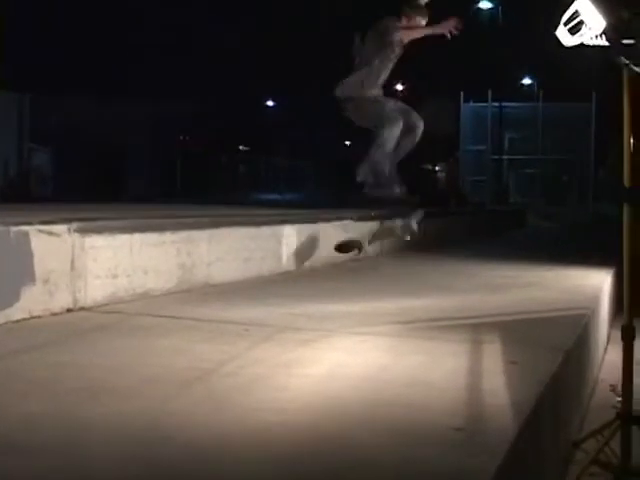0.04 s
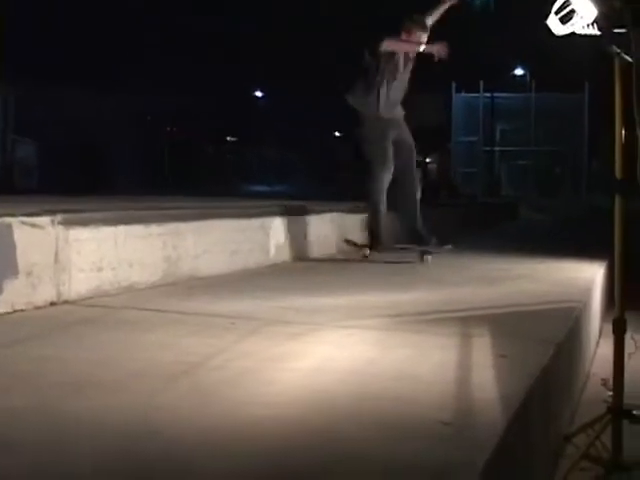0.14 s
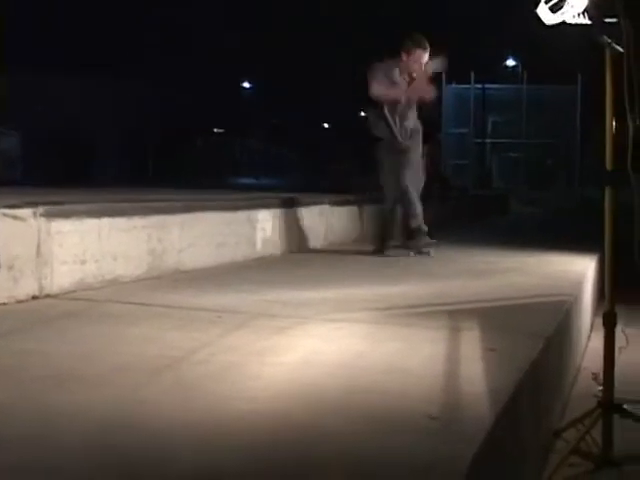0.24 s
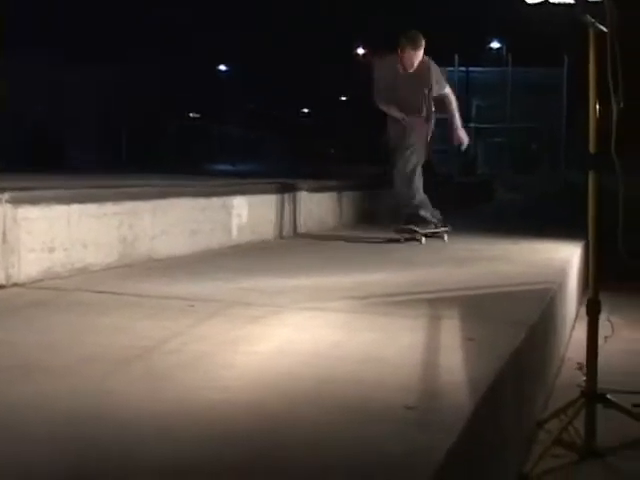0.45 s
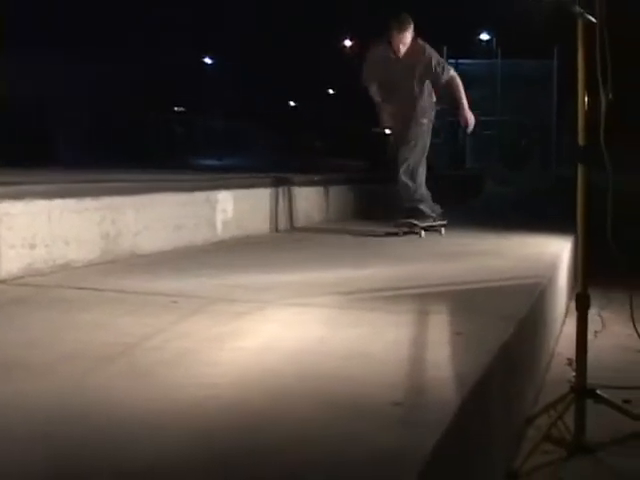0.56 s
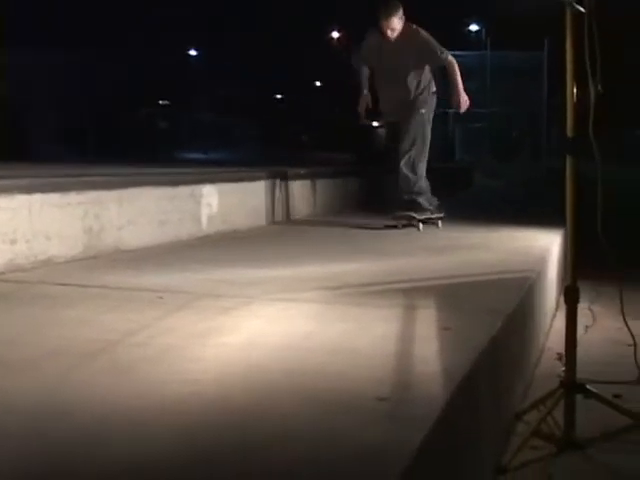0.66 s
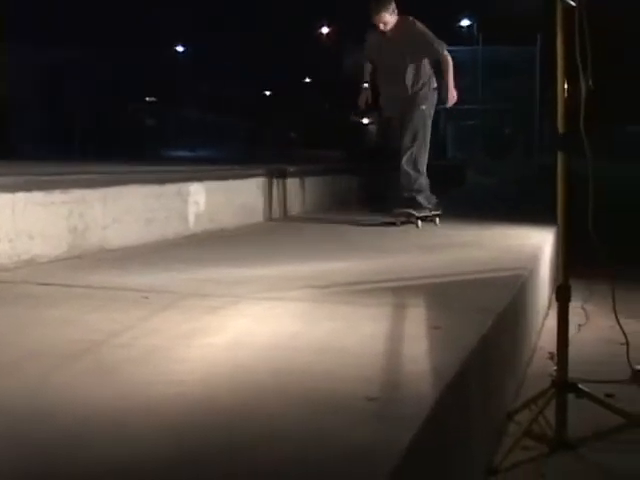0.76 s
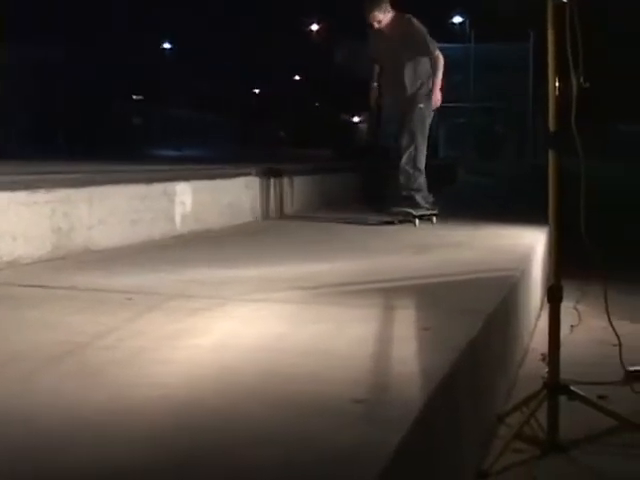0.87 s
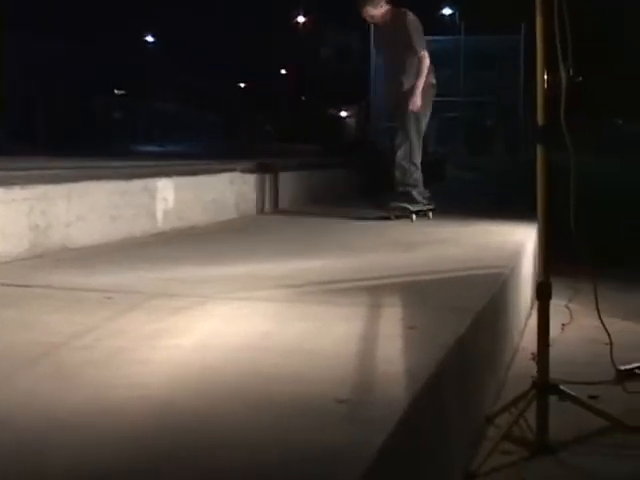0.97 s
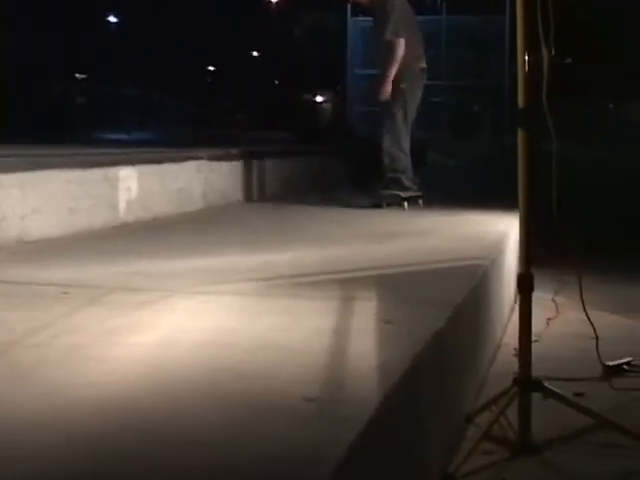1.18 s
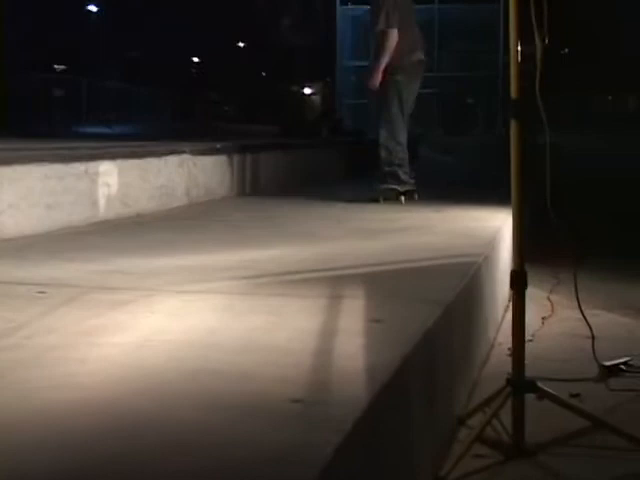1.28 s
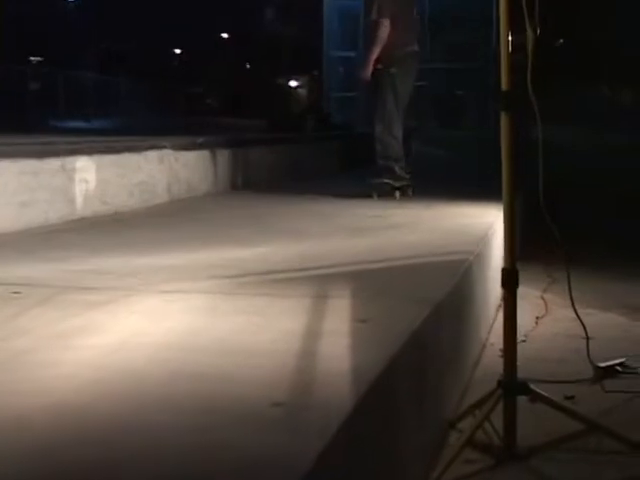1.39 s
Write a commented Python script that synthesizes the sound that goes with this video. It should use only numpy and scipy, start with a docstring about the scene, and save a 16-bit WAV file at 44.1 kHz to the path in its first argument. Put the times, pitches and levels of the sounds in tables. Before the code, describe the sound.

Sharp skateboard clacks on concrete, a short barking skid, then wheels rolling off over joints.

```python
"""A low distant hum and the faint hiss of free wheels, then a skateboard slams onto concrete at night.
Each impact excites the modes of deck, wheels and trucks; the loudest clacks overload the microphone.
The board chatters and skids briefly sideways, barking by stick-slip friction. It rolls away over two
joints, driven by the grain of the slab, its dry bearings chirping faintly. Walls return a dull echo."""
import sys
import numpy as np
from scipy import signal
from scipy.fft import rfft, irfft, next_fast_len
from scipy.io import wavfile
from scipy.ndimage import map_coordinates

SR = 44100
rng = np.random.default_rng(int(sys.argv[2]) if len(sys.argv) > 2 else 0)


def unload_audio(sound):
    """Save the sound as a 16-bit wav file, at the path given as the first command line argument."""
    columns = np.transpose(np.atleast_2d(sound))
    # keep every value between -1 and 1, then stretch to whole-number steps
    steps = np.round(np.clip(columns, -1, 1) * 32767)
    wavfile.write(sys.argv[1], SR, steps.astype(np.int16))


N = 63945

# Spectrum of the outdoor rumble (f/Hz, level/dB)
RUMBLE_SPECTRUM = [(20, -19), (45, -7.5), (75, -1.5), (105, 3), (160, -6.5), (200, -9), (400, -15),
                   (1000, -27), (3000, -47), (15000, -55)]
# Envelope of the rumble (t/s, level/dB)
RUMBLE_ENVELOPE = [(0, -40.5), (.3, -43.5), (.7, -36), (1.0, -37), (1.3, -36.5), (1.37, -38), (1.43, -33)]
# Partials of a distant engine (f/Hz, level/dB)
ENGINE_PARTIALS = [(101, -47.5), (155, -42)]
# Chirps of the dry bearings (centre t/s, f/Hz, level/dB)
BEARING_CHIRPS = [(.575, 7540, -51), (0.714, 7500, -44.5), (.773, 8270, -51), (0.854, 7360, -59),
                  (.937, 8500, -51), (.958, 6330, -66), (1.038, 7570, -47), (1.062, 8500, -51),
                  (1.111, 8100, -51.5), (1.183, 6200, -57), (1.208, 7030, -51), (1.435, 7100, -51.5)]
# Envelope of the wheels on the rough slab (t/s, level/dB)
ROLL_ENVELOPE = [(0, -54), (.09, -39), (.195, -47.5), (.23, -19), (.31, -24), (.349, -22), (.362, -23.5),
                 (.42, -28.5), (.51, -34), (.6, -36), (.7, -36.5), (.85, -41), (1.0, -42), (1.45, -43)]
# Resonances of the rolling board (f/Hz, bandwidth/Hz, level/dB)
ROLL_RESONANCES = [(261.4, 51, -5), (324, 26.5, -6), (548.4, 69, -1.5), (744, 257, -9), (1026, 81, 0),
                   (1390, 80, -10), (1543, 62, -5), (1970, 114, -11.5), (2780, 120, -23)]
# Spectrum of the wheels' gritty hiss (f/Hz, level/dB)
HISS_SPECTRUM = [(200, -7), (1500, 3), (2600, -4), (3600, -10), (4500, -4.5), (6000, -8.5), (8300, -10),
                 (10500, -16.5), (16000, -32)]
# Hollow ring of the wheels (f/Hz, level/dB relative to the rolling envelope)
WHEEL_MODES = [(1035, -10.5), (1555, -18)]
# Gritty scuffs of the wheels (centre t/s, half-width/s, level/dB)
SCUFF_SWELLS = [(0.312, 0.013, -34), (0.347, 0.0059, -32), (1.059, 0.0056, -52), (1.256, 0.042, -51.5),
                (1.303, .005, -48)]
# Resonances excited by scuffing (f/Hz, bandwidth/Hz, level/dB)
SCUFF_RESONANCES = [(2370, 790, -9), (2880, 180, -0.5), (3400, 140, -3), (4300, 170, -9), (4900, 310, -7),
                    (7600, 1500, -15)]
# Envelope of the sideways skid (t/s, level/dB)
SKID_ENVELOPE = [(.415, -50), (.424, -20.5), (.435, -19.5), (.444, -5), (.452, -9.5), (.458, -2),
                 (.464, -13.5), (.473, -3.5), (.48, -6), (.484, -19.5), (.495, -37), (.52, -63)]
# Stick-slip slows and turns regular as the wheels grip (t/s, f/Hz, level/dB over the friction noise)
SLIP_CYCLE = [(.44, 935, 1), (.452, 925, 1), (.461, 690, -2), (.47, 684, 8), (.482, 681, 8)]
# Resonances excited by the skid (f/Hz, bandwidth/Hz, level/dB)
SKID_RESONANCES = [(560, 90, -5.5), (930, 230, -7.5), (1265, 270, -1.5), (1642, 61, 5.5), (1810, 190, -0.5),
                   (2107, 210, -1), (2795, 200, -12.5), (2978, 103, -4.5), (3363, 180, -12.5),
                   (4300, 200, -16.5), (4930, 124, -9.5), (8000, 330, -20)]
# Spectrum of the grit in the skid (f/Hz, level/dB)
SKID_SPECTRUM = [(100, -34), (400, -27), (1500, 5.5), (4000, -4), (8000, -2.5), (11000, -11.5),
                 (16000, -31)]
# Deep, short thuds under the heaviest clacks (t/s, level/dB, f/Hz, T60/s)
LOW_THUDS = [(.207, -23, 34, 0.16), (0.2087, -11.5, 231, 0.057), (0.278, -25, 33, 0.29),
             (0.624, -28, 146, 0.1), (0.868, -24.5, 153, 0.07)]
# Modes of the deck with its trucks and wheels (f/Hz, level/dB, multiple of the base T60)
DECK_MODES = [(197.4, -21.5, 1.5), (283.6, -12, 1.24), (475, -11, 0.94), (576, -7, 1.3), (710, -10.5, 0.95),
              (871, -12, 1.05), (1022, -7.5, 1.43), (1120, -16, 0.81), (1322, -10, 1.08), (1424, -7, 0.84),
              (1646, -14, 0.76), (1874, -4.5, 0.79), (2057, -8, 0.94), (2397, -13.5, 0.63)]
# Spectrum of the contact crack (f/Hz, level/dB)
CRACK_SPECTRUM = [(150, -17.5), (600, 1), (1500, 7.5), (2700, -7), (4000, -7), (5500, -9.5), (8000, -10),
                  (11000, -20), (16000, -35)]
# Bright resonances of trucks and wheels (f/Hz, bandwidth/Hz, level/dB)
TRUCK_RESONANCES = [(2560, 190, 7.5), (3495, 285, 3.5), (4980, 200, 2), (5200, 180, 2), (5825, 144, 0.5),
                    (7100, 81, -24), (8100, 220, -24), (8900, 140, -6), (9930, 200, -16)]
# Deck and wheels hit the ground (t/s, level/dB, thump/dB, wheels/dB, trucks/dB, crack/dB, base T60/s)
LANDING_IMPACTS = [(.2063, 4, 2, 3, 2.5, -2, 0.038), (.2125, 1.5, -0.5, -7, -4, -9, 0.034),
                   (.2205, -9, -5, -10, 3, 5, .036), (.2365, -29, 17, -15, 25, 6, 0.021),
                   (.2485, -3.5, -0.5, -16, 6, 3, 0.082), (.2763, 2, -14, 0.5, 5, -1, 0.031),
                   (.2825, -1, -2, 5.5, -13, -0.5, 0.057), (.294, -16, -4, 14, 11, 9, 0.045),
                   (.3699, 11.5, -14, 0.5, -15.5, -9.5, 0.013), (.3874, -5.5, -7.5, 7.5, 3, -1, 0.032),
                   (.401, -5, -13, 5, 1, 2, 0.028), (.4142, -12.5, -18, 4, -17, -2, 0.062)]
# Wheels drop into the slab joints (columns as for the landing)
JOINT_IMPACTS = [(.6218, -12.5, -0.5, 4, -20, 1.5, 0.056), (.6348, -6.5, -9.5, -2, -0.5, 2, .046),
                 (.6515, -22.5, -0.5, 6.5, 1, -5, 0.042), (.8663, -20, -26, 12.5, 5.5, 2.5, 0.023),
                 (.8682, -19, 7.5, 8.5, 4.5, 0, 0.037), (.8822, -24, 3, -12, 7, 11, 0.073),
                 (.8895, -23.5, 8, -5, -10, 3, 0.015)]

TIME = np.arange(N) / SR


def amp(db):
    """Amplitude ratio: tenfold for every 20 dB."""
    return 10 ** (np.asarray(db) / 20)


def unit(x):
    """Normalisation to an rms of 1."""
    return x / np.sqrt(np.mean(x ** 2) + 1e-20)


def envelope(points):
    """Gain per sample by linear interpolation of (t/s, level/dB) points."""
    return amp(np.interp(TIME, *np.transpose(points)))


def wobble(knots_per_s):
    """Smooth fluctuation by spline interpolation of random values."""
    return map_coordinates(rng.standard_normal(N // 8), [TIME * knots_per_s], mode="wrap")


def filtered(x, response):
    """Linear filtering: the spectrum is multiplied by a frequency response."""
    size = next_fast_len(N + SR // 2)
    return irfft(rfft(x, size) * response(np.fft.rfftfreq(size, 1 / SR)), size)[:N]


def coloured(x, spectrum):
    """Spectral shaping by (f/Hz, level/dB) points, at rms 1."""
    hz, db = np.transpose(spectrum)
    return unit(filtered(x, lambda f: amp(np.interp(np.log(f + 1), np.log(hz), db))))


def resonate(x, resonances):
    """Forced response of parallel damped resonators of alternating sign, at rms 1."""
    def response(f):
        return sum((-1) ** k * amp(db) * 1j * f * width / (hz * hz - f * f + 1j * f * width)
                   for k, (hz, width, db) in enumerate(resonances))
    return unit(filtered(x, response))


def noise():
    """White noise: equal mean power at all frequencies."""
    return rng.standard_normal(N)


def decay(t, t60):
    """Exponential damping by 60 dB in t60 seconds."""
    return np.exp(-np.log(1000) * t / t60)


def grains(per_s=4000):
    """Shot noise: tiny independent impacts on the concrete's grain."""
    return noise() * (rng.random(N) < per_s / SR)


def wavering(partials, depth_db, level_rate, drift_rad, phase_rate):
    """Random amplitude and phase modulation of (f/Hz, level/dB) tones; rates in knots a second."""
    out = np.zeros(N)
    for hz, db in partials:
        gain = amp(db + depth_db * wobble(level_rate))
        out += gain * np.sin(2 * np.pi * hz * TIME + drift_rad * wobble(phase_rate))
    return out


def night_hum():
    """Tones of a distant engine are superposed on low broadband rumble."""
    drone = wavering(ENGINE_PARTIALS, depth_db=1, level_rate=12, drift_rad=1.3, phase_rate=6.6)
    return drone + envelope(RUMBLE_ENVELOPE) * coloured(noise(), RUMBLE_SPECTRUM)


def yard_echo(x, t60=0.21, cutoff_hz=2500):
    """Reverberation from ledge and walls: convolution with a dull, decaying impulse response."""
    tail = filtered(noise() * decay(TIME, t60), lambda f: 1 / (1 + 1j * f / cutoff_hz))
    return signal.fftconvolve(x, tail / np.linalg.norm(tail))[:N]


def bearings(half_width_s=0.011, fall_hz_per_s=13000, spread_hz=440):
    """Dry bearings emit thin, falling chirps, blurred by random frequency modulation."""
    out = np.zeros(N)
    for centre, hz, db in BEARING_CHIRPS:
        t = TIME - centre
        pitch = hz - fall_hz_per_s * t + spread_hz * wobble(1100)
        out += amp(db) * np.exp(-(t / half_width_s) ** 2) * np.sin(2 * np.pi * np.cumsum(pitch) / SR)
    return out


def rolling(flutter_db=0.7, touchdown_s=0.207):
    """Surface roughness drives deck and wheels, fading with distance; in the air the free wheels hiss."""
    drumming = resonate(grains(), ROLL_RESONANCES)
    drumming += amp(-8) * coloured(grains() + grains(), HISS_SPECTRUM)
    ring = wavering(WHEEL_MODES, depth_db=1, level_rate=40.9, drift_rad=1.1, phase_rate=60)
    free_spin = amp(-43.5) * coloured(noise(), HISS_SPECTRUM) * (TIME < touchdown_s)
    flutter = amp(flutter_db * wobble(30.34))
    return envelope(ROLL_ENVELOPE) * (flutter * drumming + ring) + free_spin


def scuffs():
    """Friction on grit under the wheels excites high resonances in short swells."""
    swell = sum(amp(db) * np.exp(-((TIME - centre) / half) ** 2) for centre, half, db in SCUFF_SWELLS)
    return swell * resonate(grains() + grains(), SCUFF_RESONANCES)


def skid(jitter=0.014, low_cut_hz=450):
    """Stick-slip oscillation: a gritty bark turns to a squeal as periodic slips outweigh the noise."""
    times, slip_hz, slip_db = np.transpose(SLIP_CYCLE)
    cycles = np.cumsum(np.interp(TIME, times, slip_hz) * (1 + jitter * wobble(500))) / SR
    slips = unit(np.diff(np.floor(cycles), prepend=0))  # one impulse per cycle
    slip_gain = amp(np.interp(TIME, times, slip_db))
    friction = (slip_gain * slips + noise()) / np.hypot(slip_gain, 1)
    bark = resonate(friction, SKID_RESONANCES)
    bark = filtered(bark, lambda f: 1 - 1 / (1 + (f / low_cut_hz) ** 6))
    grit = coloured(noise() * (1 - cycles % 1) ** 2, SKID_SPECTRUM)  # a burst after each slip
    sliding = (TIME > SKID_ENVELOPE[0][0]) & (TIME < SKID_ENVELOPE[-1][0])
    return sliding * envelope(SKID_ENVELOPE) * (bark + amp(-11.5) * grit)


def low_thuds():
    """Damped sinusoids, heard as deep, short thuds under the heaviest clacks."""
    out = np.zeros(N)
    for onset, db, hz, t60 in LOW_THUDS:
        t = np.maximum(TIME - onset, 0)
        out += amp(db) * np.sin(2 * np.pi * hz * t) * decay(t, t60)
    return out


def clacks(impacts, thump_below_hz=780, wheel_below_hz=1230, scatter_db=1.5, contact_s=0.00071):
    """Impact excitation: deck and wheel modes decay freely under a hard crack that rings the trucks."""
    out = np.zeros(N + SR)
    t = np.arange(SR // 4) / SR
    attack = 1 - np.exp(-t / contact_s)
    for onset, db, thump_db, wheel_db, truck_db, crack_db, base_t60 in impacts:
        ring = 0
        for k, (hz, mode_db, multiple) in enumerate(DECK_MODES):
            struck_db = thump_db if hz < thump_below_hz else wheel_db if hz < wheel_below_hz else 0
            gain = amp(mode_db + struck_db + scatter_db * rng.standard_normal())
            ring += (-1) ** k * gain * np.sin(2 * np.pi * hz * t) * decay(t, base_t60 * multiple)
        crack = amp(crack_db - 3.5) * coloured(noise(), CRACK_SPECTRUM)
        trucks = amp(truck_db - 10) * resonate(noise(), TRUCK_RESONANCES)
        burst = (crack + trucks)[:len(t)] * decay(t, t60=0.033)
        out[round(onset * SR):][:len(t)] += amp(db) * (ring + burst) * attack
    return out[:N]


def scene():
    """Superposition of all sources; clacks, skid and scuffs reverberate weakly in the open yard."""
    board = clacks(LANDING_IMPACTS) + clacks(JOINT_IMPACTS) + skid() + scuffs()
    echo = amp(-26.5) * yard_echo(board)
    return (board + echo + low_thuds() + rolling() + bearings() + night_hum())[None]


def record(dry):
    """Saturation: the microphone flattens peaks near full scale, and its band ends at 16 kHz."""
    clipped = dry[0] / (1 + np.abs(dry[0]) ** 12) ** (1 / 12)
    return filtered(clipped, lambda f: f < 16000)[None]


dry = scene()
out = record(dry)
unload_audio(out)
```